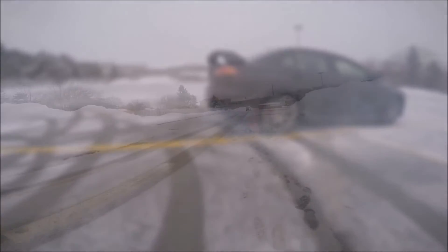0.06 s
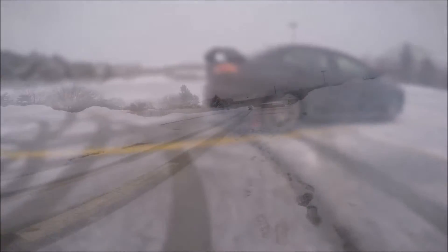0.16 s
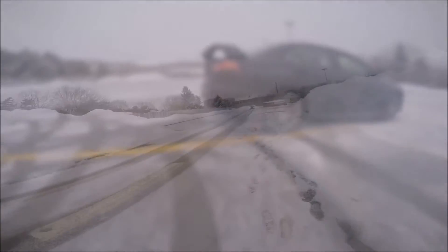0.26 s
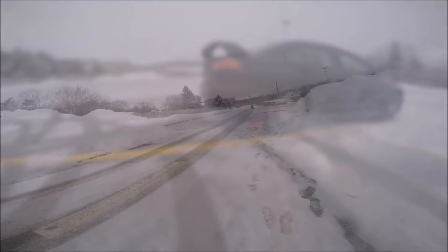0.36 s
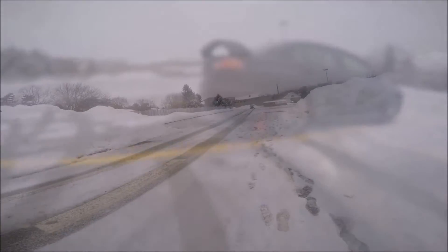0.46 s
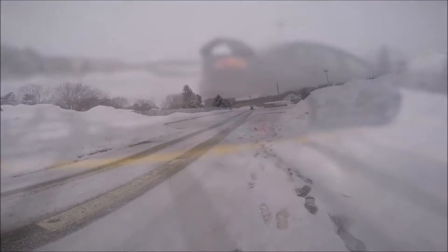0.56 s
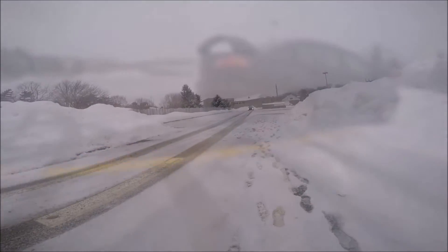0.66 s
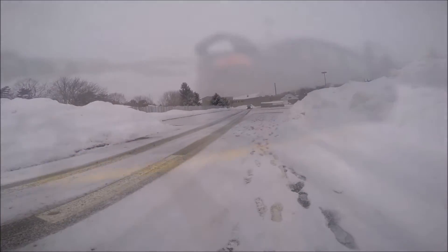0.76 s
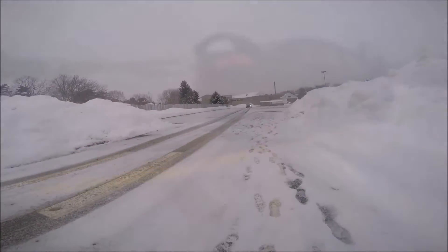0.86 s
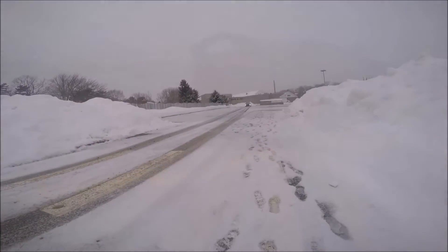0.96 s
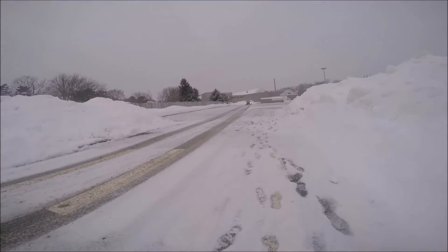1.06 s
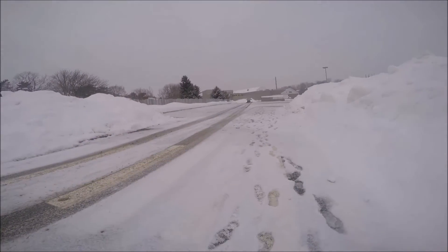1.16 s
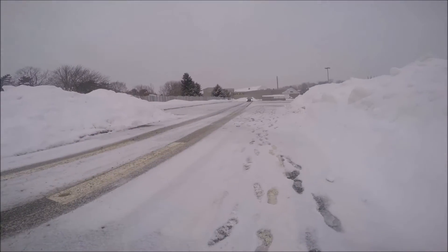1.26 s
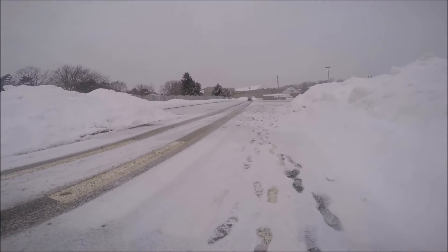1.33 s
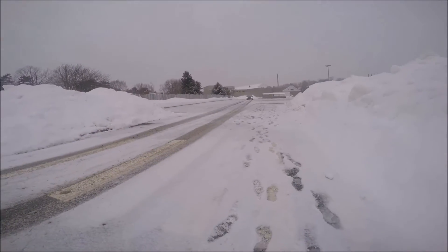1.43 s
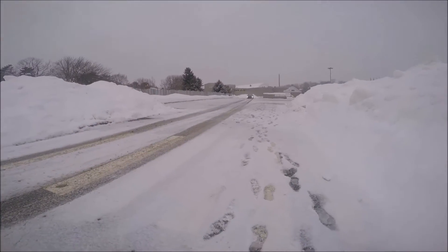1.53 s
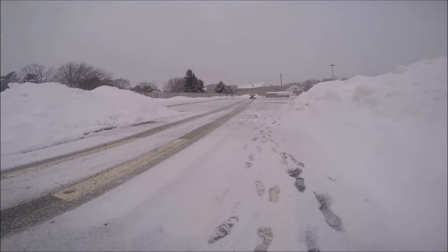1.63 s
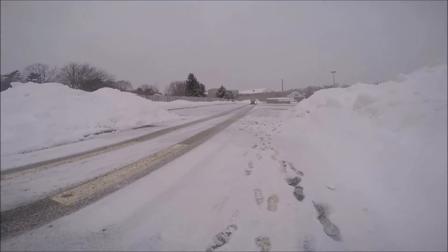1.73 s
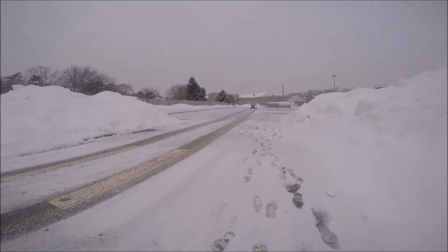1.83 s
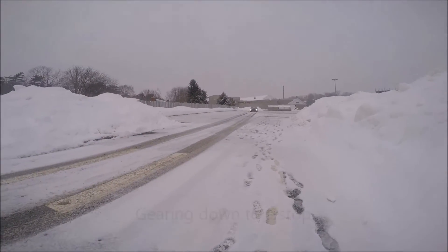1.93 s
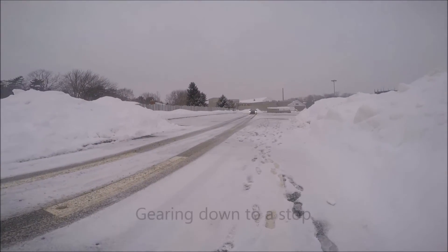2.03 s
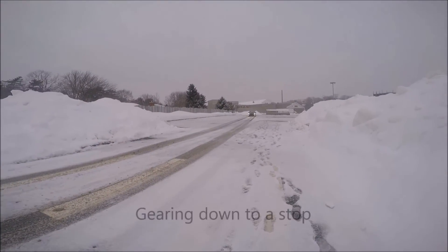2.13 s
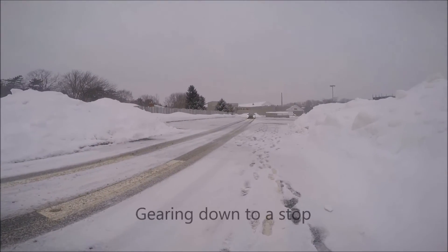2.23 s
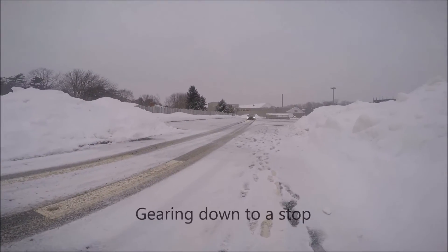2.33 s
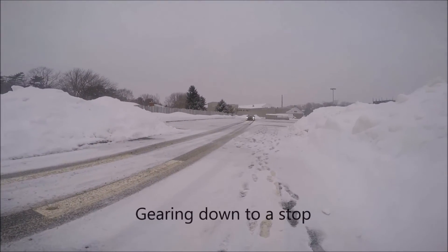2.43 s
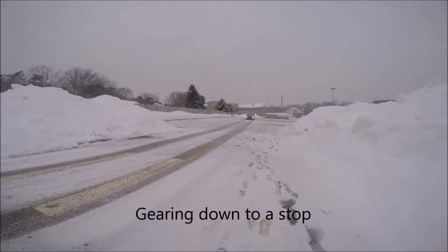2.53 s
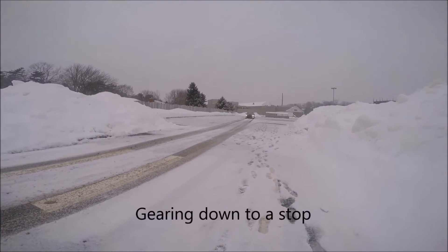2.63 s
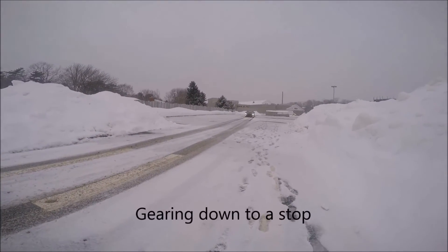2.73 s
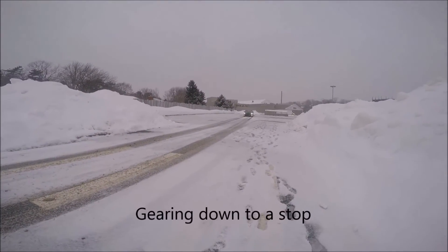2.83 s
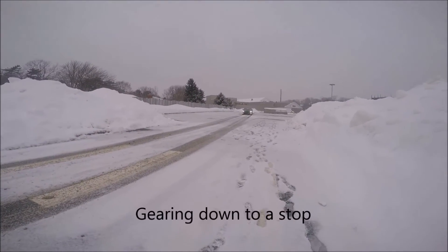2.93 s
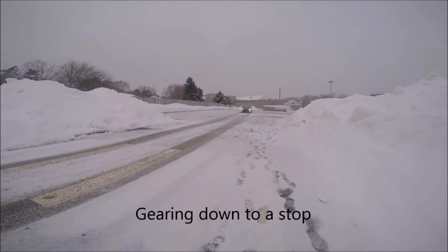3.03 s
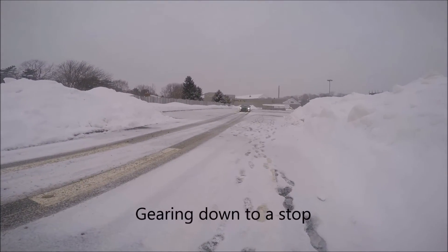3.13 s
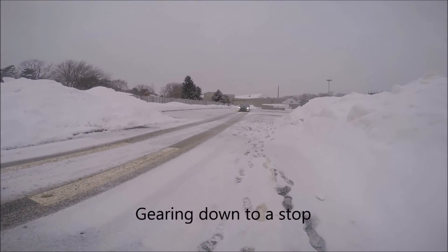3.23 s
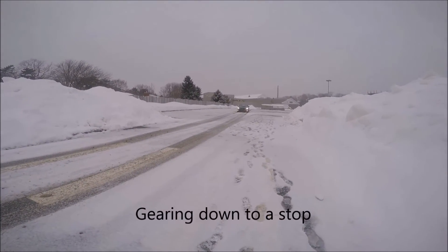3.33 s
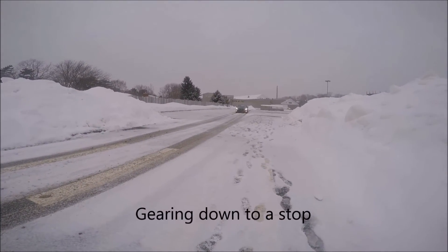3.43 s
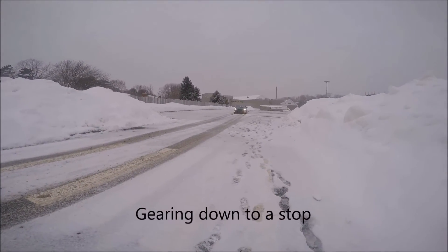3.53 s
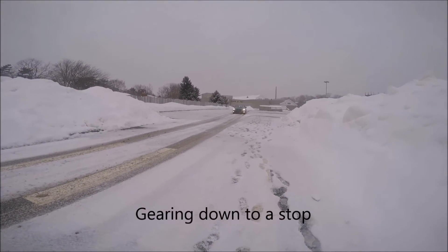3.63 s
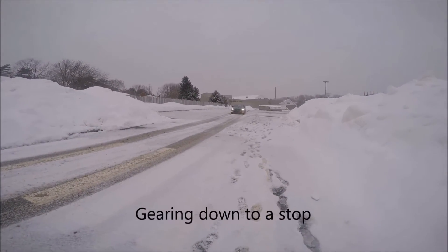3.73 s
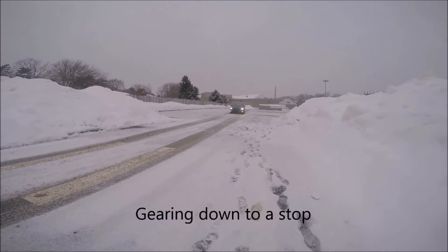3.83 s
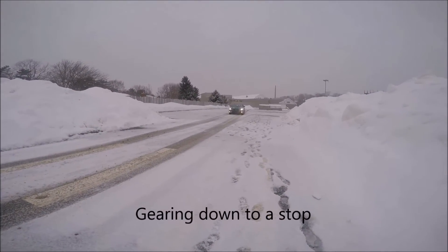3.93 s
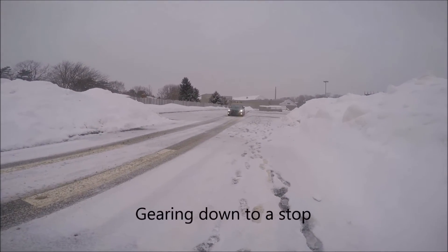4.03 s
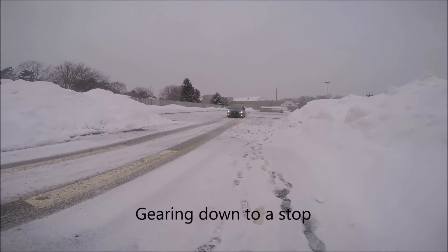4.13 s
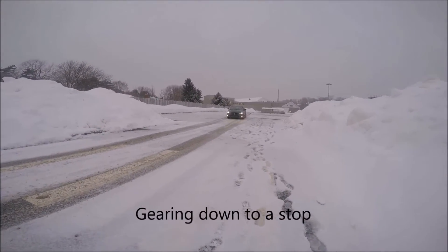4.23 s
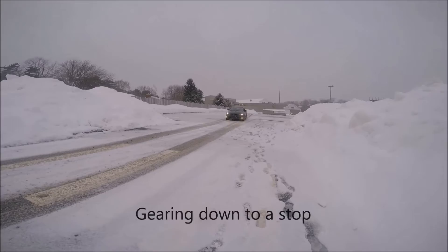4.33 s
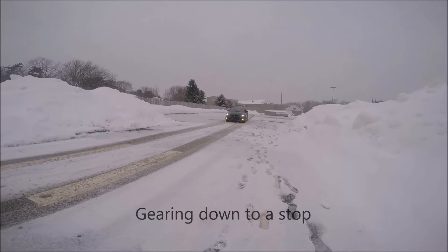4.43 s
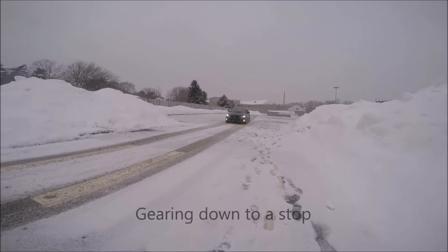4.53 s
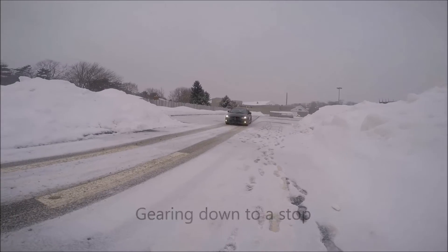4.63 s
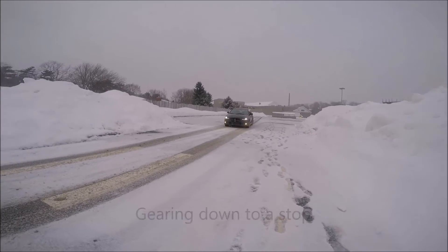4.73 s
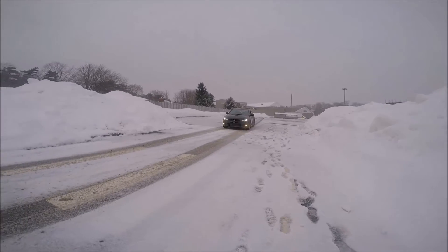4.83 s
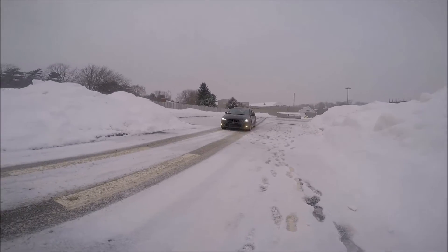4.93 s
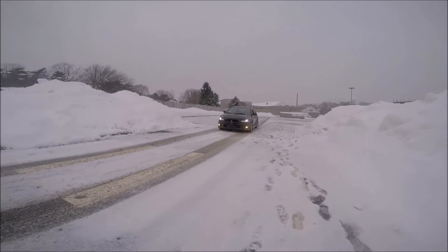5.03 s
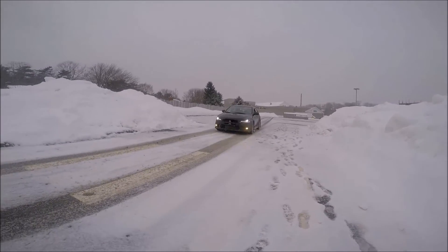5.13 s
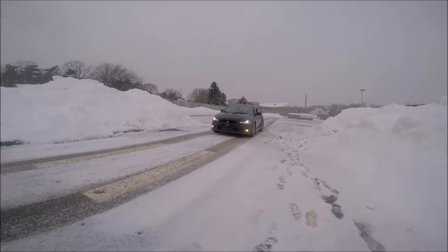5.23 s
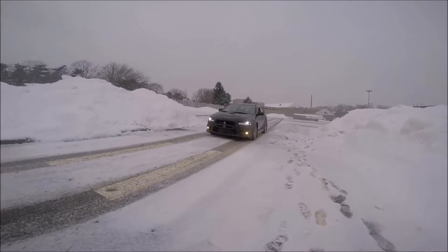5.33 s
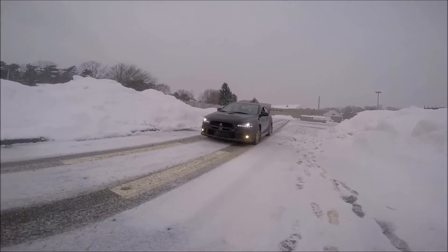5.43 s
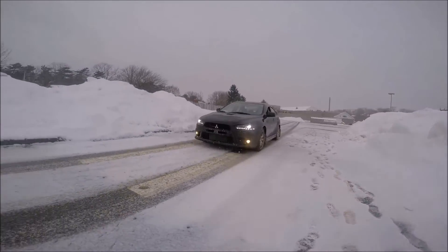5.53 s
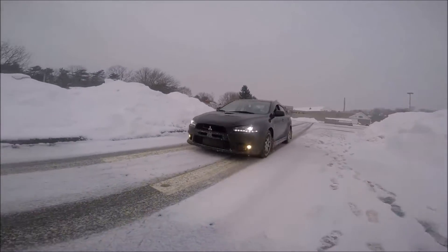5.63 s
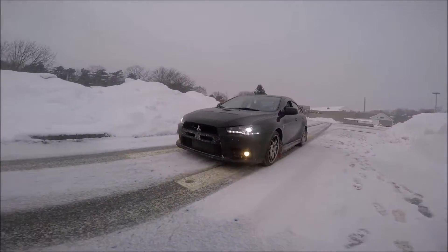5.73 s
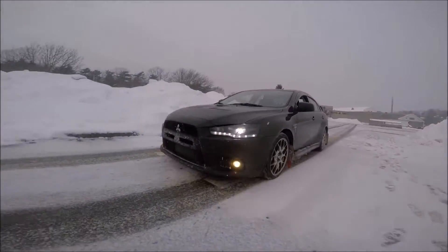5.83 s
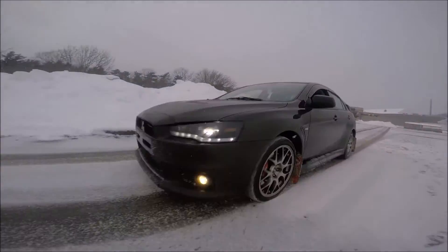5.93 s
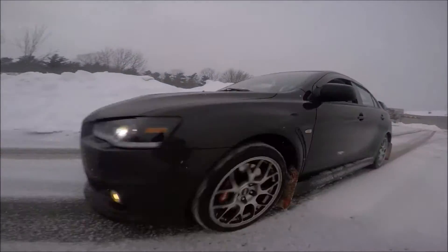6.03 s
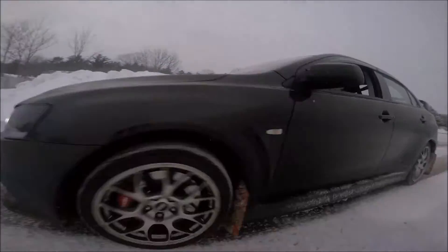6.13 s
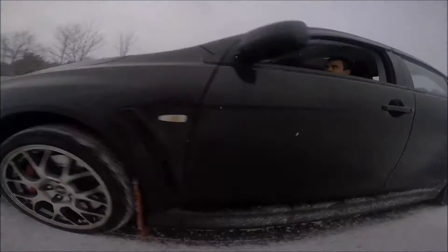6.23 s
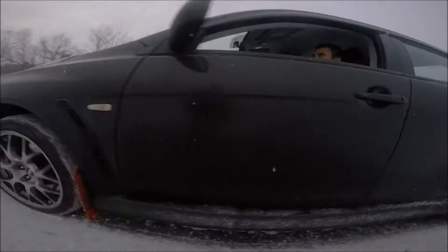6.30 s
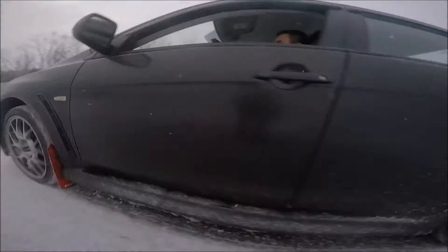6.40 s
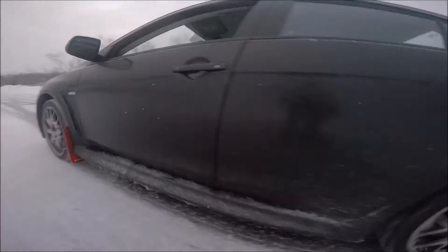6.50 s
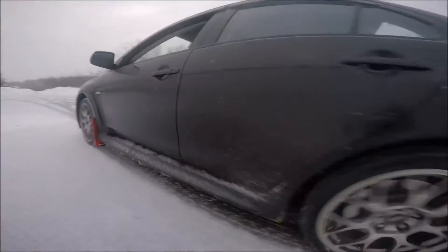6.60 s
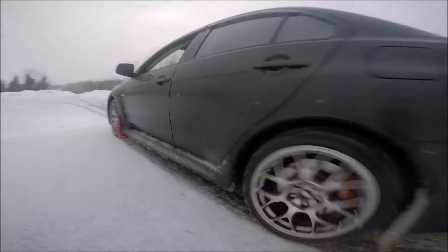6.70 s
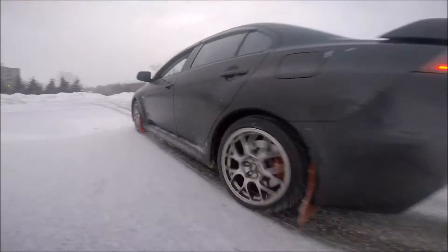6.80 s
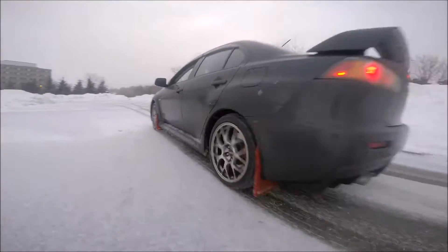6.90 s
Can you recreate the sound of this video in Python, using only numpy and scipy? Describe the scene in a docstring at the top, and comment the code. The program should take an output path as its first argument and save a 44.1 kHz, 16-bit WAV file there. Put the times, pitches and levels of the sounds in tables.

```python
"""A turbocharged four-cylinder car on snow, heard from a small camera on the ground in gusty wind.
First it slides round a lot: wheels spin, the loud exhaust throbs, the revs surge twice, sleet ticks on
the housing. After a cut it comes down the road while icy lumps knock on the housing. It blips down two
gears, the pipe booming at the firing rate, and unburnt fuel thuds on the overrun. Last it rolls past
at arm's length: tyres crunch snow and throw grit, a brake squeaks."""
import sys
import numpy as np
from scipy import signal
from scipy.fft import rfft, irfft
from scipy.io import wavfile
from scipy.ndimage import uniform_filter1d

SR = 44100
rng = np.random.default_rng(int(sys.argv[2]) if len(sys.argv) > 2 else 0)


def master_out(mix):
    """Clip the mix to full scale and print it as 16-bit PCM to the path in sys.argv[1]."""
    frames = np.transpose(np.atleast_2d(mix))
    ceiling = np.clip(frames, -1, 1)
    pcm = np.round(ceiling * 32767).astype(np.int16)
    wavfile.write(sys.argv[1], SR, pcm)


N = 306936
TIME = np.arange(N) / SR
CUT_S, CUT_FADE_S, CUT_CLICK_DB = 1.078, 0.005, -25

# noise spectra: (frequency [Hz], density [dB])
WIND_SPECTRUM = [(10, -17.5), (22, -3), (35, -1), (60, -5.5), (90, -13), (140, -16.5), (250, -31),
                 (600, -59.5)]
HOUSING_SPECTRUM = [(1900, -7), (2700, 1), (3600, -7), (5000, 5.5), (6500, -4.5), (8500, -5.5), (11000, -5),
                    (15000, -6)]
CRUST_SPECTRUM = [(400, -10), (900, 0), (1500, -13), (2100, -12.5), (3100, -5.5), (4000, -12), (5600, -9),
                  (7500, -34)]
WHEELSPIN_SPECTRUM = [(250, 5), (500, 2.5), (650, -4.5), (760, -1.5), (1000, -3), (1150, -10), (1300, -6),
                      (1600, -19.5), (2100, -29.5)]
ROLLING_SPECTRUM = [(300, -7.5), (600, -2), (690, -4), (800, 1), (1000, -1), (1350, -2), (1800, -12.5),
                    (2100, -13.5), (2800, -20), (3300, -40)]
SLUSH_SPECTRUM = [(1500, 4), (2200, -3.5), (2850, 2), (3150, -6), (4100, -6.5), (4400, 0), (5100, 1.5),
                  (5700, -2.5), (7000, -10.5), (9800, -21), (11000, -24.5), (15500, -18.5)]
GRIT_SPECTRUM = [(1200, -9), (2000, 1), (3300, -1.5), (4200, -8.5), (6000, -28), (8000, -26)]
MIST_SPECTRUM = [(5500, -3), (7500, -3), (10000, -1.5), (11500, -8.5), (15500, -17.5)]
BURBLE_SPECTRUM = [(70, -7), (110, -2), (150, 0), (220, -12), (295, -5), (400, -16.5)]
GAS_SPECTRUM = [(90, -17.5), (160, 1), (300, 4.5), (450, -1), (680, -7), (800, -7.5), (1000, -9),
                (1500, -29), (2000, -53.5)]
POWDER_SPECTRUM = [(3500, 6), (5000, 12), (7500, -5), (13000, 1), (15500, -2)]

# wind on the microphone, sheltered by the passing car: (time [s], level [dB])
WIND_LEVEL = [(0, -19), (1.05, -18.5), (1.12, -26.5), (2.9, -26.5), (5.1, -26), (5.55, -26.5), (6, -39),
              (6.55, -48), (6.73, -21), (6.96, -35)]
# gusts; puffs of fine snow: (time [s], boost [dB], half width [s])
WIND_GUSTS = [(.93, -1, 0.049), (1.49, 6.5, 0.037), (1.77, 6.5, 0.18), (3.45, 8, 0.13), (4.79, 7, 0.13)]
SNOW_PUFFS = [(.53, 7, 0.13), (1.05, 4.5, 0.082)]
# sleet on the housing: (time [s], peak [dB], ring [Hz], decay [ms])
SLEET_TICKS = [(0.217, -38, 8500, .8), (.258, -22, 2900, 1.06), (.316, -20, 5450, 0.52),
               (.443, -31, 4300, 1.7), (.489, -28.5, 3100, 1.1), (0.598, -32, 5540, 1.6),
               (1.7315, -19, 7900, 0.8), (3.043, -31.5, 8370, 1.5), (3.3246, -32.5, 5743, 0.58),
               (3.4178, -22, 4000, 1.1)]
# icy lumps on the housing: (time [s], peak [dB])
LUMP_HITS = [(1.1545, -35), (1.432, -25), (1.4594, -14.5), (1.5619, -20), (1.601, -24), (1.7315, -26),
             (1.801, -36)]
# housing modes: (frequency [Hz], bandwidth [Hz], gain [dB])
HOUSING_MODES = [(788, 81, 3), (1015, 114, 8), (1500, 140, -3), (2390, 130, -1), (2580, 156, -4),
                 (3280, 250, -6)]

# crusts crushed, and at 1.461 s the ringing tail of an icy lump's knock: (time [s], peak [dB], pitch [Hz], t60
# [s], body gain [dB])
CRUST_BREAKS = [(.435, -21, 696, 0.084, 27), (1.153, -24, 1480, 0.035, 21), (1.461, -23.5, 950, .09, 14),
                (1.757, -30, 3100, .2, 8), (1.799, -19, 1410, 0.14, 17), (1.826, -24, 1120, 0.045, 14),
                (6.204, -12.5, 961, 0.05, 23), (6.445, -22.5, 1878, 0.044, 23),
                (6.478, -25.5, 2800, .03, 19), (6.785, -24.5, 1082, 0.11, 23)]
# tyres far off, through slush, then passing: (time [s], roar [dB], hiss [dB])
TYRE_LEVELS = [(1.1, -44.5, -57.5), (1.7, -42.5, -54), (1.86, -37.5, -48.5), (2.3, -44.5, -54),
               (2.44, -46.5, -64.5), (2.9, -43, -56.5), (3.5, -46, -62), (4.42, -43, -59), (4.56, -33, -52),
               (4.7, -33, -45), (5.05, -30.5, -46), (5.85, -25, -40.5), (6.36, -27.5, -40.5),
               (6.52, -36.5, -46), (6.75, -39.5, -49), (6.96, -44.5, -58)]
# grit as the car nears and each wheel passes: (time [s], level [dB], half width [s])
GRIT_BURSTS = [(5.3, -53, .4), (5.97, -40, 0.27), (6.3, -37, 0.17), (6.65, -48.5, 0.18)]
# fine spray, last stretch of road: (time [s], level [dB])
MIST_ENVELOPE = [(4.42, -67.5), (4.66, -55), (5.8, -55.5), (6.38, -50), (6.6, -68)]
# brake squeaks: (time [s], level [dB], half width [s])
BRAKE_BURSTS = [(6.791, -37, 0.0047), (6.814, -27.5, 0.01)]
# brake tones: (frequency [Hz], gain [dB])
BRAKE_MODES = [(1070, -0.84), (1740, -1.7), (2760, 0)]

# overrun burble: (time [s], level [dB], half width [s])
BURBLE_BURSTS = [(2.61, -31.5, 0.082), (3.21, -30.5, 0.039), (3.39, -28, 0.035), (3.64, -28, 0.036),
                 (4.44, -25.5, 0.046), (4.72, -23, 0.12), (4.84, -21.5, 0.02), (5.17, -33.5, 0.019)]
# exhaust thuds: (time [s], peak [dB], pitch [Hz])
EXHAUST_THUDS = [(0.392, -8.5, 55.3), (1.051, -6.5, 48), (4.772, -9.5, 62.27), (4.833, -11, 70),
                 (4.86, -18, 105), (5.0345, -4.5, 92), (5.16, -6, 104), (5.189, -5.5, 98)]
# overrun overtones at 1.5, 2, 2.5 .. x firing rate: (gain [dB])
OVERRUN_ORDERS_DB = [-4.5, -2, -9, -2, -0.5, -10, -1.5, -12, -14, -7, -14, -10, -10, -11, -12, -12, -12,
                     -11]
# throttle overtones at 2, 3, 4 .. x firing rate: (gain [dB])
THROTTLE_ORDERS_DB = [-2.5, 1, -7.5, -6, -4, -11, -9, -7, -8]
# pipe resonances; its deep resonance at low revs: (frequency [Hz], gain [dB])
PIPE_RESPONSE = [(100, -6), (170, 0), (240, -1.5), (312, 2), (340, -3), (378, -.5), (440, 1.5), (475, 2),
                 (550, -5.5), (625, -2.5), (720, -6), (850, -2.5), (1200, -6)]
DEEP_RESPONSE = [(20, -16), (27, -9), (41, -6), (52, -2), (60, 0), (75, -3), (83, -8), (98, -8.5),
                 (125, -19)]
# two surges on the lot: (time [s], firing rate [Hz], tyre roar [dB])
LOT_SLIDE = [(0, 58.8, -31), (.17, 61.84, -31), (.27, 74.2, -31), (.42, 71.9, -30), (.54, 59, -38.5),
             (.71, 62.6, -38.5), (.82, 76.67, -33.5), (.93, 78.4, -30.5), (1.07, 66.5, -30)]
# boom sinks as each surge ends: (time [s], gain [dB], half width [s])
SURGE_ENDS = [(.45, -10, 0.04), (.99, -9, 0.036)]
# revs sink in gear, jump at each downshift: (time [s], firing rate [Hz])
ROAD_REVS = [(1.1, 99.2), (1.3, 97.7), (1.79, 77.4), (2.03, 78.33), (2.44, 79.5), (2.6, 104.4),
             (2.72, 128.9), (3.04, 130.9), (3.3, 100.5), (3.47, 106.6), (3.6, 102.7), (4.23, 98.55),
             (4.44, 94.6), (4.69, 150.3), (5, 135.4), (5.21, 134.6), (5.4, 123.1), (5.58, 108.8),
             (5.7, 104.7), (5.86, 107.8), (6.03, 103.2), (6.2, 95.7), (6.44, 82.97), (6.78, 68.73),
             (6.96, 63.3)]
# exhaust grows as the car nears: (time [s], boom [dB], rasp [dB], growl [dB])
EXHAUST_LEVELS = [(1.1, -42, -43.5, -52), (1.6, -27.5, -36.5, -54), (2.1, -26.5, -39.5, -44),
                  (2.4, -35, -38, -50.5), (3.1, -25, -38.5, -46.5), (3.5, -17.5, -34, -43.5),
                  (4.3, -15, -33, -40), (5.1, -19, -31, -37.5), (5.25, -8, -31.5, -36.5),
                  (5.6, -11.5, -33, -38.5), (5.9, -10.5, -33.5, -34.5), (6.25, -10, -29.5, -33.5),
                  (6.42, -10, -41, -36.5), (6.64, -12, -31.5, -39), (6.75, -11.5, -39, -42),
                  (6.96, -11, -42.5, -54)]
# less boom at high revs: (firing rate [Hz], gain [dB])
BOOM_VS_REVS = [(110, -0.5), (122, -3), (134, -7.5), (150, -8.5)]
# downshift blips: (time [s], boom boost [dB], half width [s])
THROTTLE_BLIPS = [(2.61, 11, 0.076), (4.55, 3, 0.04)]
# barks on the throttle: (time [s], level [dB], half width [s], low-pass corner [Hz])
THROTTLE_BARKS = [(2.63, -32.5, .085, 480), (4.6, -35, .1, 800), (5.86, -28, .24, 640),
                  (6.2, -36, .12, 330), (6.48, -33.5, .15, 300)]
# boom flutters far off and on the overrun, steadies close by: (time [s], roughness [0-1])
BOOM_FLUTTER = [(1.1, 0.2), (3.4, 0.33), (4.4, 0.37), (4.7, 0.49), (5.15, 0.45), (5.5, 0.05), (6.6, 0.04),
                (6.96, 0.06)]
# boom dips briefly as the car passes: (time [s], depth [0-1], half width [s])
BOOM_DIPS = [(6.697, 0.8, 0.019), (6.838, 0.52, 0.027)]


def undb(db):
    """Decibels to gain."""
    return 10 ** (np.asarray(db) / 20)


def unit(x):
    """Scale to rms 1."""
    return x / np.sqrt(np.mean(x ** 2))


def curves(table):
    """Per-sample curve for each column after time."""
    s, *columns = np.transpose(table)
    return [np.interp(TIME, s, c) for c in columns]


def swells(table):
    """Sum of bell curves, one per (time [s], height, half width [s]) row."""
    return sum(height * np.exp(-((TIME - s) / width_s) ** 2) for s, height, width_s in table)


def bursts(table):
    """Gain swelling from silence, once per (time [s], level [dB], half width [s]) row."""
    return swells([(s, undb(db), width_s) for s, db, width_s in table])


def colour(x, spectrum):
    """Filter by a spectrum table, steep skirts outside it; rms 1."""
    hz, db = np.transpose(spectrum)
    f = np.maximum(np.arange(N // 2 + 1) * SR / N, 1)
    skirts = np.minimum(f / hz[0], 1) ** 2 * np.minimum(hz[-1] / f, 1) ** 2
    return unit(irfft(rfft(x) * undb(np.interp(np.log(f), np.log(hz), db)) * skirts, N))


def noise(spectrum):
    """Coloured noise; rms 1."""
    return colour(rng.standard_normal(N), spectrum)


def walk(rate_hz):
    """Random steps, smoothed twice; rms 1."""
    hold = int(SR / rate_hz)
    steps = np.repeat(rng.standard_normal(N // hold + 1), hold)
    return unit(uniform_filter1d(uniform_filter1d(steps, hold), hold)[:N])


def grains(rate_hz, spread_db):
    """Random impulses, a few much bigger than the rest."""
    sizes = undb(spread_db * np.minimum(rng.exponential(size=N), 5))
    return unit((rng.random(N) < rate_hz / SR) * sizes * rng.standard_normal(N))


def ring(x, hz, q):
    """One resonance, gain 1 at centre."""
    return signal.lfilter(*signal.iirpeak(min(hz, SR / 2 - 2000), max(q, 1), fs=SR), x)


def add(out, s, sound, peak_db):
    """Mix in at a time and peak level."""
    i = int(s * SR)
    out[i:i + len(sound)] += (undb(peak_db) * sound / np.abs(sound).max())[:N - i]


def wind():
    """Gusts buffet the microphone."""
    rumble = noise(WIND_SPECTRUM)
    steady = rumble / np.sqrt(uniform_filter1d(rumble ** 2, SR // 8))
    level_db, = curves(WIND_LEVEL)
    eddies_db = 2.5 * walk(11)
    return steady * undb(level_db + swells(WIND_GUSTS) + eddies_db)


def powder():
    """Fine snow blows over the housing."""
    return colour(grains(4000, spread_db=0.86), POWDER_SPECTRUM) * undb(-58.5 + swells(SNOW_PUFFS))


def sleet():
    """Sleet taps the housing; the struck spot rings twice as long as the tap."""
    out, t = np.zeros(N), TIME[:SR // 5]
    taps = np.array_split(noise(HOUSING_SPECTRUM), len(SLEET_TICKS))
    for (s, db, hz, decay_ms), tap in zip(SLEET_TICKS, taps):
        fade = np.exp(-1000 * t / decay_ms)
        ping = np.sin(2 * np.pi * hz * t) * np.sqrt(fade)
        add(out, s, tap[:len(t)] * fade + 0.8 * ping, db)
    return out


def knocks():
    """Icy lumps ring the housing's modes, each from another spot."""
    out, t = np.zeros(N), TIME[:SR // 5]
    modes = [undb(db) * np.sin(2 * np.pi * hz * t) * np.exp(-np.pi * width_hz * t)
             for hz, width_hz, db in HOUSING_MODES]
    contact = 1 - np.exp(-t / 0.000085)  # snow gives on landing
    for s, db in LUMP_HITS:
        spot_gains = undb(rng.normal(0, 3, len(modes)))
        add(out, s, contact * (spot_gains @ modes), db)
    return out


def crunches():
    """Snow crusts give way, and one lump knock rings on: crackle plus one body resonance."""
    out, t = np.zeros(N), TIME[:SR // 5]
    crackles = np.array_split(colour(grains(7000, spread_db=1), CRUST_SPECTRUM), len(CRUST_BREAKS))
    attack = 1 - np.exp(-t / 0.0006)
    for (s, db, hz, t60_s, body_db), crackle in zip(CRUST_BREAKS, crackles):
        crunch = crackle[:len(t)] * attack * undb(-60 * t / t60_s)
        add(out, s, crunch + undb(body_db) * ring(crunch, hz, q=4.4), db)
    return out


def brake():
    """The pad catches on the disc and rings a few tones."""
    tones = sum(undb(db) * np.sin(2 * np.pi * hz * TIME + 0.47 * walk(200)) for hz, db in BRAKE_MODES)
    return bursts(BRAKE_BURSTS) * tones / len(BRAKE_MODES)


def spray():
    """Treads throw clumps of wet grit and fine mist, heard only close by."""
    grit = colour(grains(4000, spread_db=0.73), GRIT_SPECTRUM) * bursts(GRIT_BURSTS)
    clumps_db = 1.5 * walk(45)
    mist_db, = curves(MIST_ENVELOPE)
    return grit * undb(clumps_db) + noise(MIST_SPECTRUM) * undb(mist_db)


def tyres(spectrum, roar_db, hiss_db):
    """Treads crush packed snow in dense grains and fling slush into the arches."""
    roar = colour(grains(9000, spread_db=1.7), spectrum) * undb(roar_db + 1.5 * walk(30))
    hiss = colour(grains(16000, spread_db=1.5), SLUSH_SPECTRUM) * undb(hiss_db + 1.4 * walk(30))
    return roar + hiss


def afterfire(half_width_cycles=0.51):
    """Unburnt fuel burbles in the pipe and goes off in thuds, one pressure swing each."""
    out = noise(BURBLE_SPECTRUM) * bursts(BURBLE_BURSTS)
    for s, db, hz in EXHAUST_THUDS:
        cycles = hz * (TIME - s)
        out -= undb(db) * np.cos(2 * np.pi * cycles) * np.exp(-(cycles / half_width_cycles) ** 2)
    return out


def firing_phase(firing_hz):
    """Phase [rad], one turn per firing."""
    return 2 * np.pi * np.cumsum(firing_hz) / SR


def rasp(phase):
    """Gas rasps out with every firing; rms 1."""
    return unit(noise(GAS_SPECTRUM) * (1 + 0.57 * np.cos(phase) + 0.2 * np.cos(phase / 2)))


def growl(firing_hz, overrun_gain, throttle_gain, corner_hz, scatter_rad):
    """Overtones cross the pipe's resonances: half-order steps on overrun, whole orders on throttle."""
    phase = firing_phase(firing_hz) + 0.033 * walk(60)  # firing jitter
    out = np.zeros(N)
    for halves, overrun_db in enumerate(OVERRUN_ORDERS_DB, start=3):
        order = halves / 2
        order_hz = order * firing_hz
        rolloff = np.hypot(1, (order_hz / corner_hz) ** 4)
        bark = 0 if halves % 2 else throttle_gain * undb(THROTTLE_ORDERS_DB[halves // 2 - 2]) / rolloff
        pipe_db = np.interp(order_hz, *np.transpose(PIPE_RESPONSE))
        flicker_db = 2.5 * walk(8)
        rms = np.hypot(overrun_gain * undb(overrun_db), bark) * undb(pipe_db + flicker_db)
        blurred = order * (phase + scatter_rad * walk(18))  # gusty air blurs high orders most
        out += np.sqrt(2) * rms * np.sin(blurred + 2 * np.pi * rng.random())
    return out


def lot_exhaust(firing_hz, roughness=0.22):
    """Low revs under load: one throb per three firings rings the pipe's deep resonance."""
    phase = firing_phase(firing_hz) + 0.2 * walk(25)
    throb_phase, throb_hz = phase / 3, firing_hz / 3
    throb = sum(np.cos(k * throb_phase) * undb(np.interp(k * throb_hz, *np.transpose(DEEP_RESPONSE)))
                for k in range(1, 6))
    boom = np.sqrt(2) * throb * undb(-17.5 + swells(SURGE_ENDS) + 2.7 * roughness * walk(40))
    gas = undb(-35) * (1 + 0.55 * np.cos(throb_phase)) * rasp(phase)
    return boom + gas + growl(firing_hz, undb(-40), undb(-39.5), corner_hz=330, scatter_rad=0.07)


def road_exhaust():
    """Engine braking: the pipe booms at the firing rate, growls on overrun, barks on throttle."""
    firing_hz, = curves(ROAD_REVS)
    flutter, = curves(BOOM_FLUTTER)
    boom_db, rasp_db, growl_db = curves(EXHAUST_LEVELS)
    *_, corner_hz = curves(THROTTLE_BARKS)
    throttle_gain = bursts(row[:3] for row in THROTTLE_BARKS)
    overtones = growl(firing_hz, undb(growl_db), throttle_gain, corner_hz, 0.05 + 0.16 * flutter)
    dip_db = 20 * np.log10(np.maximum(1 - swells(BOOM_DIPS), 0.05))
    boom_db += np.interp(firing_hz, *np.transpose(BOOM_VS_REVS)) + swells(THROTTLE_BLIPS) + dip_db
    phase = firing_phase(firing_hz)
    boom = np.sqrt(2) * np.cos(phase + flutter * walk(25)) * undb(boom_db + 4.1 * flutter * walk(40))
    lope = 1 + 0.038 * np.cos(phase / 2)  # strong and weak firings alternate
    return lope * (boom + undb(rasp_db) * rasp(phase)) + overtones


def lot():
    """The car slides: throbbing exhaust, blown powder, wheelspin."""
    firing_hz, roar_db = curves(LOT_SLIDE)
    return lot_exhaust(firing_hz) + powder() + tyres(WHEELSPIN_SPECTRUM, roar_db, hiss_db=-56)


def road():
    """The car approaches and rolls past."""
    roar_db, hiss_db = curves(TYRE_LEVELS)
    return road_exhaust() + tyres(ROLLING_SPECTRUM, roar_db, hiss_db) + spray() + brake()


def scene():
    """Lot, cut with a faint click, road; thuds, ice and wind over both. Mono."""
    on_road = np.clip((TIME - CUT_S) / CUT_FADE_S + 0.5, 0, 1)
    car = (1 - on_road) * lot() + on_road * road()
    click = np.exp(-TIME[:SR // 100] / 0.00027)
    add(car, CUT_S, click, CUT_CLICK_DB)
    return (car + afterfire() + sleet() + knocks() + crunches() + wind())[None]


def record(dry):
    """Camera electronics: faint whine, hiss, steep low-pass."""
    whine_hz, cutoff_hz = 12617.3, 15300
    whine = undb(-70) * np.sin(2 * np.pi * whine_hz * TIME)
    hiss = undb(-85) * rng.standard_normal(N)
    lowpass = signal.ellip(10, 0.2, 70, cutoff_hz, fs=SR, output="sos")
    return signal.sosfilt(lowpass, dry + whine + hiss)


dry = scene()
out = record(dry)
master_out(out)
```